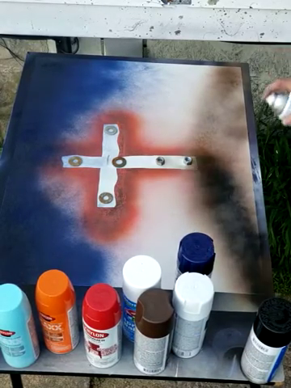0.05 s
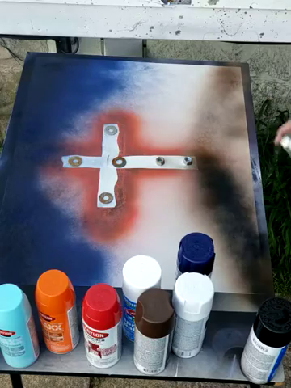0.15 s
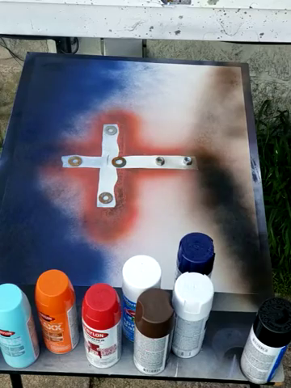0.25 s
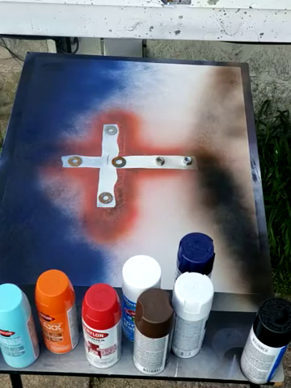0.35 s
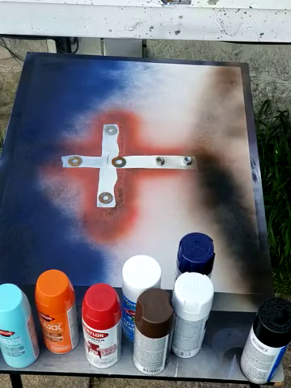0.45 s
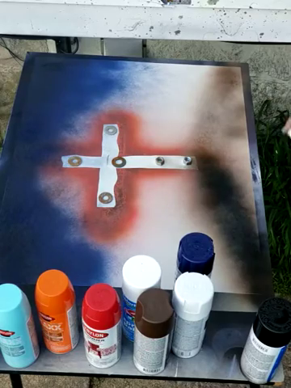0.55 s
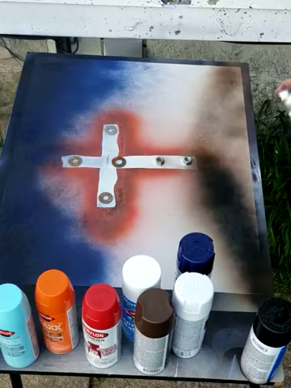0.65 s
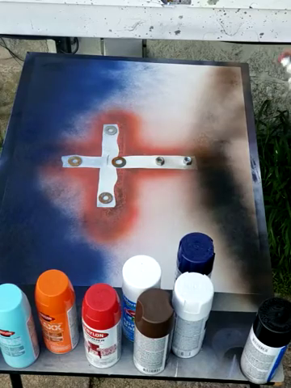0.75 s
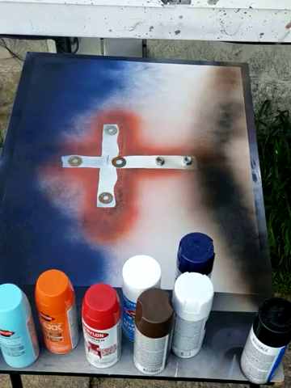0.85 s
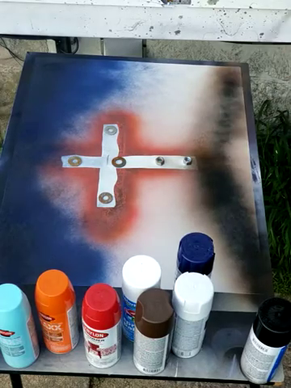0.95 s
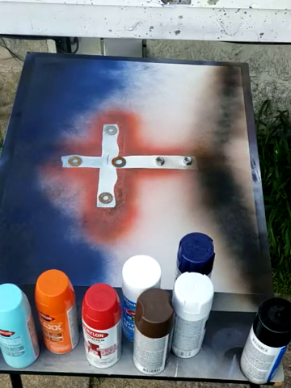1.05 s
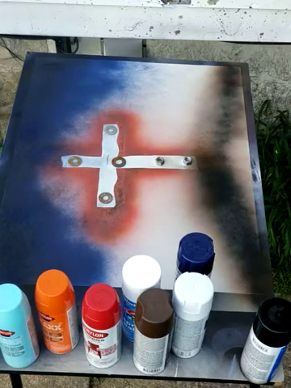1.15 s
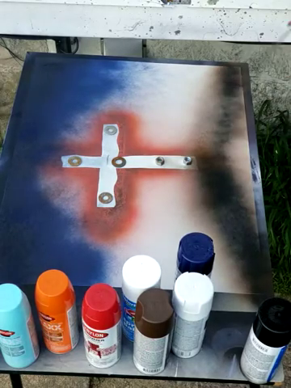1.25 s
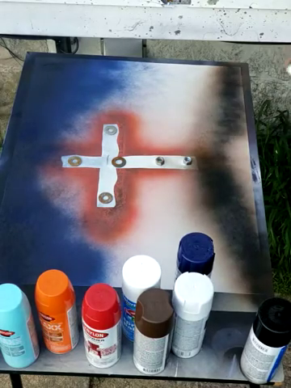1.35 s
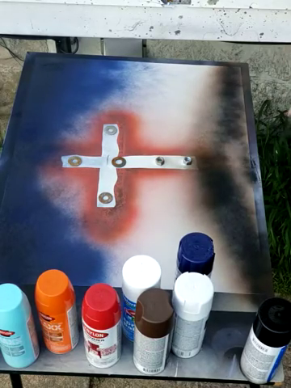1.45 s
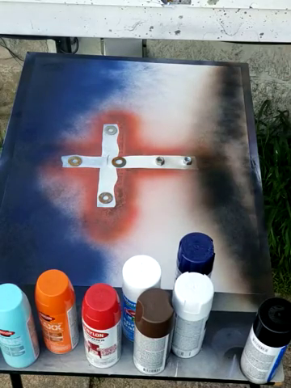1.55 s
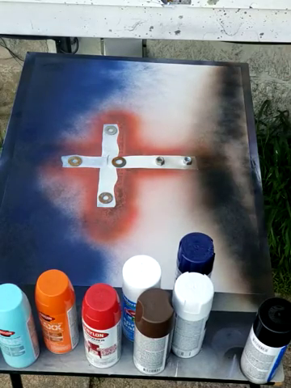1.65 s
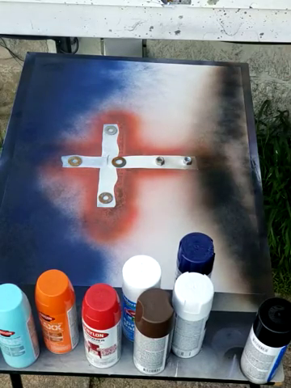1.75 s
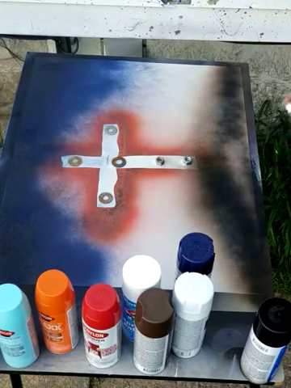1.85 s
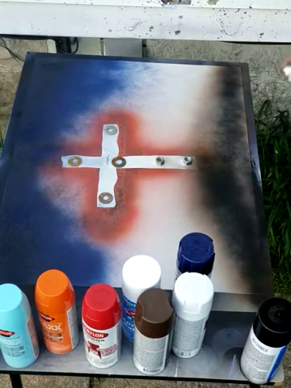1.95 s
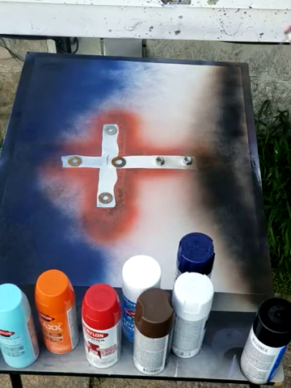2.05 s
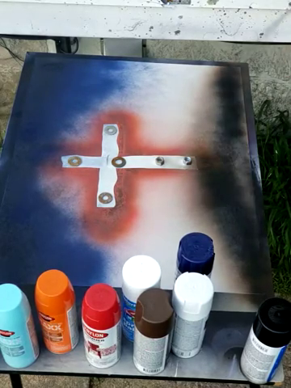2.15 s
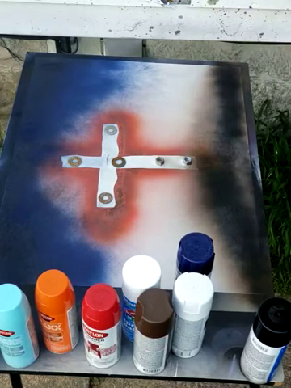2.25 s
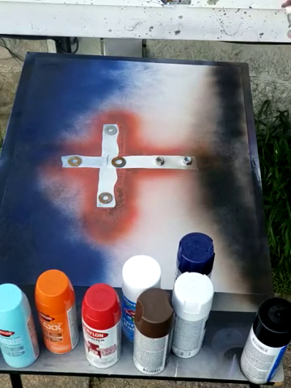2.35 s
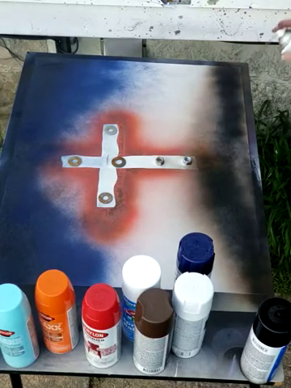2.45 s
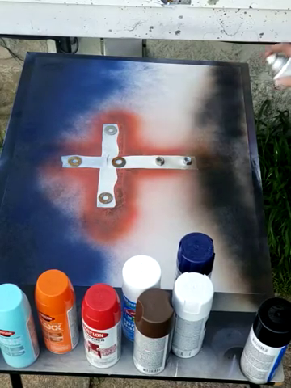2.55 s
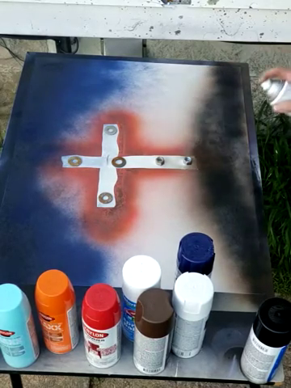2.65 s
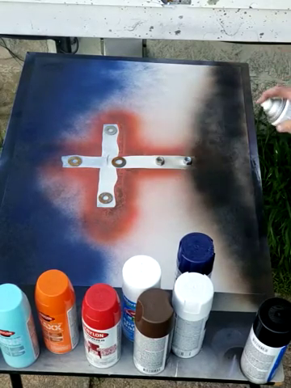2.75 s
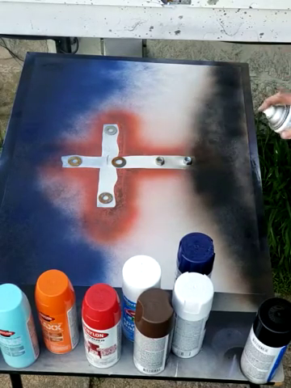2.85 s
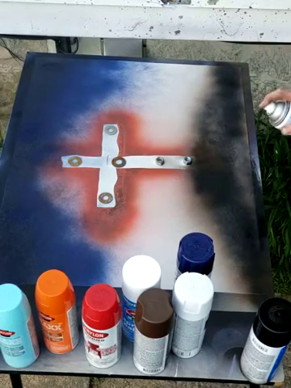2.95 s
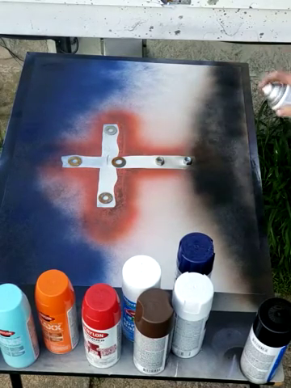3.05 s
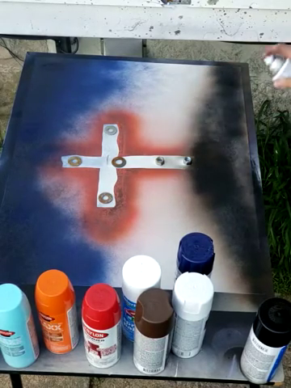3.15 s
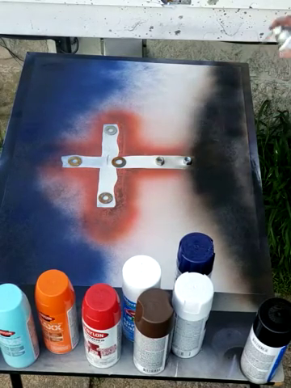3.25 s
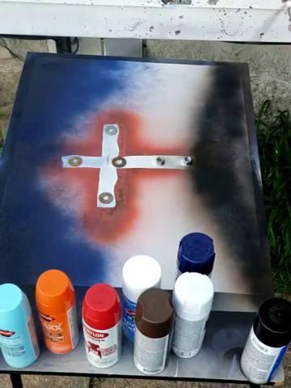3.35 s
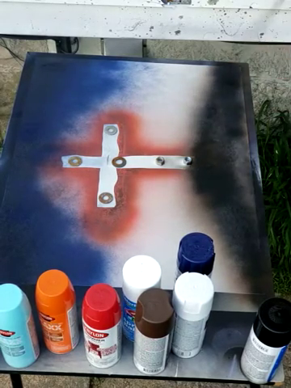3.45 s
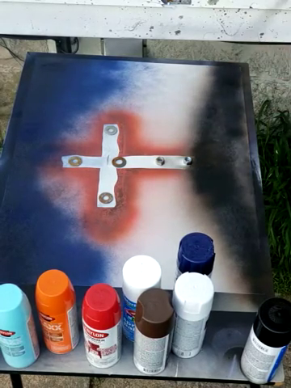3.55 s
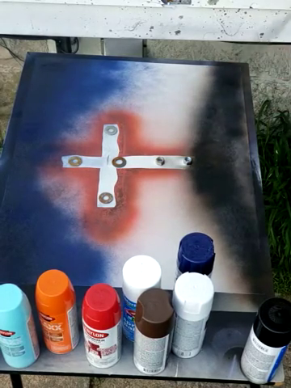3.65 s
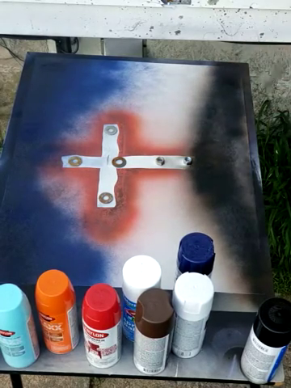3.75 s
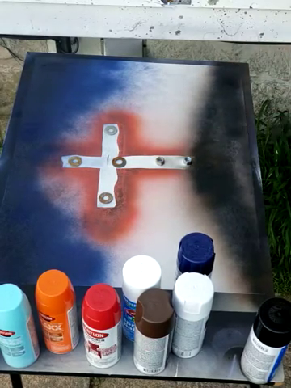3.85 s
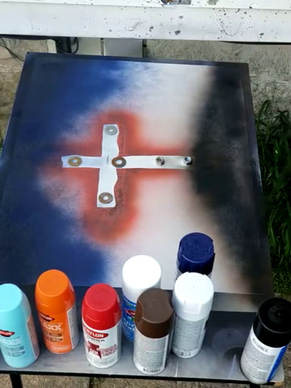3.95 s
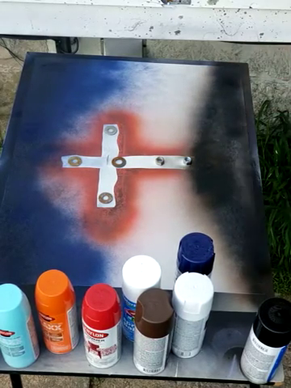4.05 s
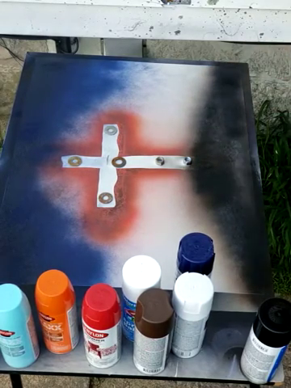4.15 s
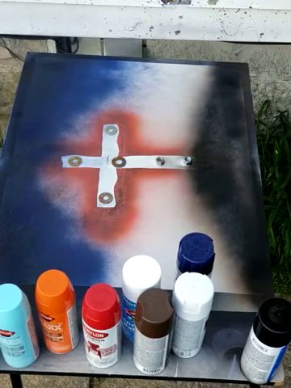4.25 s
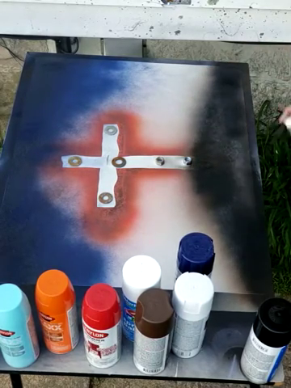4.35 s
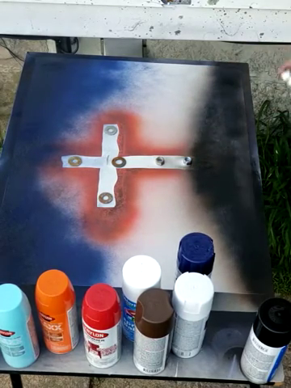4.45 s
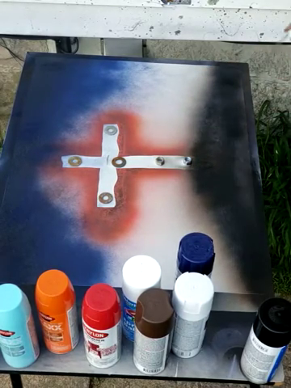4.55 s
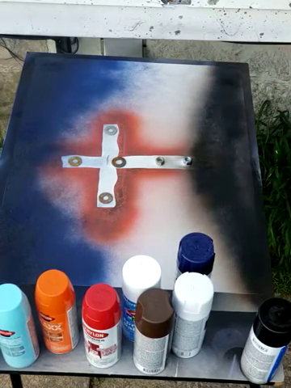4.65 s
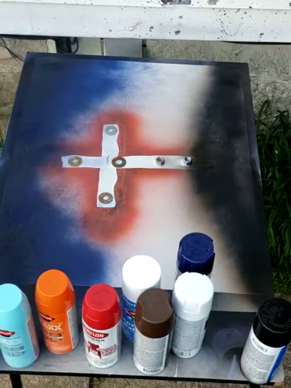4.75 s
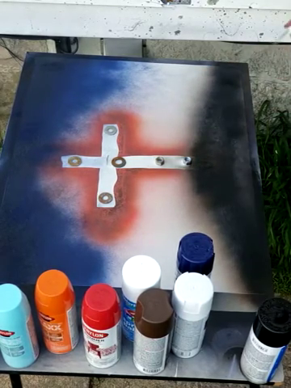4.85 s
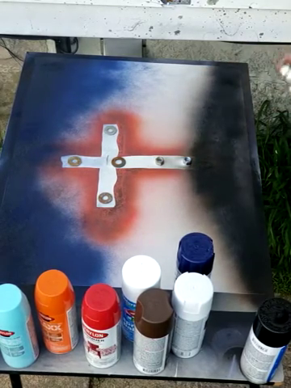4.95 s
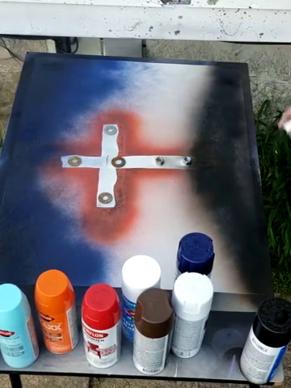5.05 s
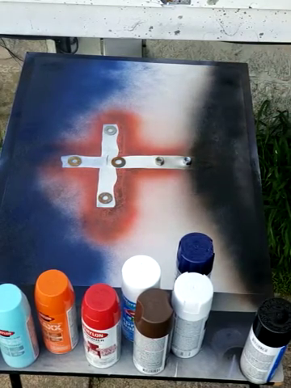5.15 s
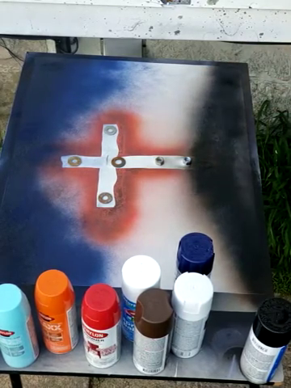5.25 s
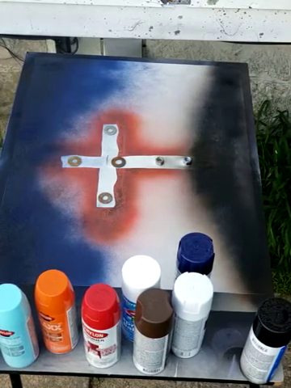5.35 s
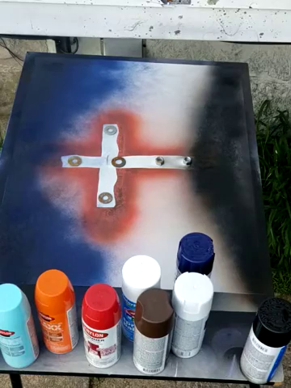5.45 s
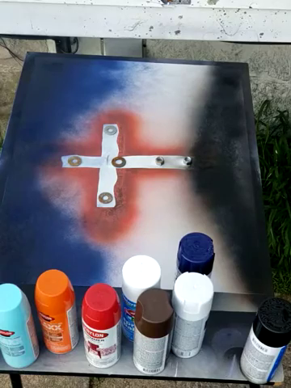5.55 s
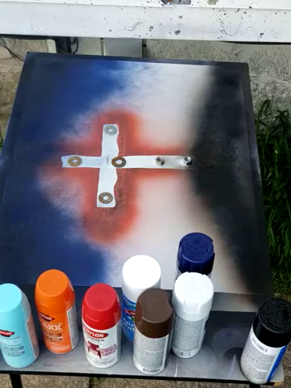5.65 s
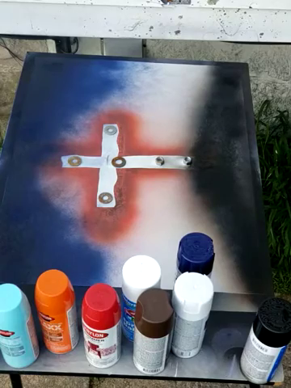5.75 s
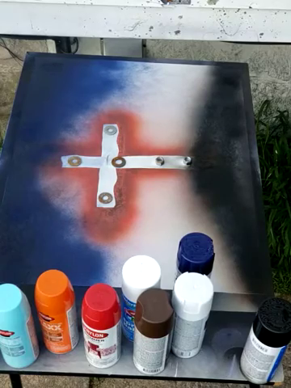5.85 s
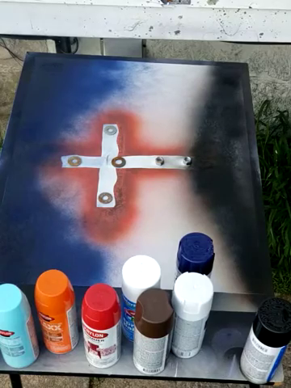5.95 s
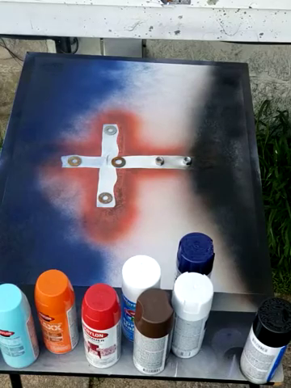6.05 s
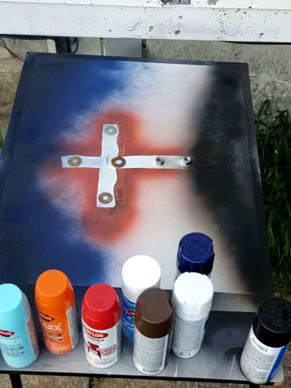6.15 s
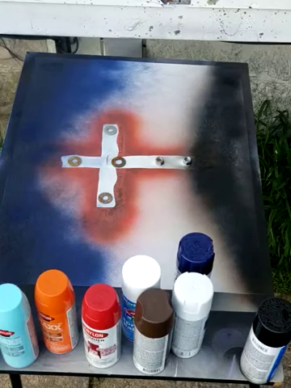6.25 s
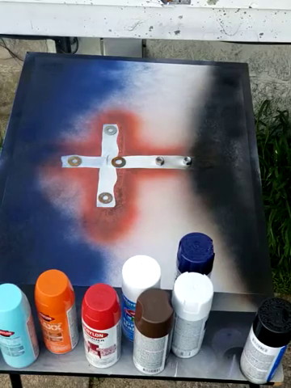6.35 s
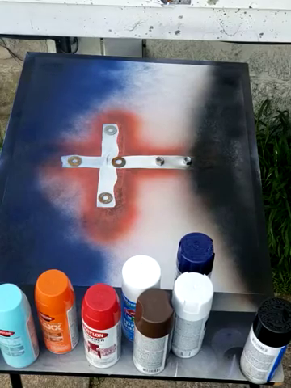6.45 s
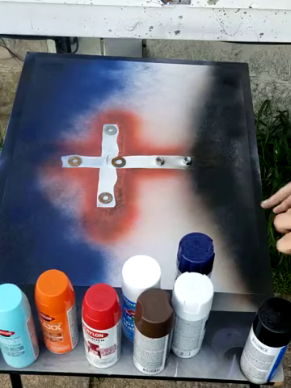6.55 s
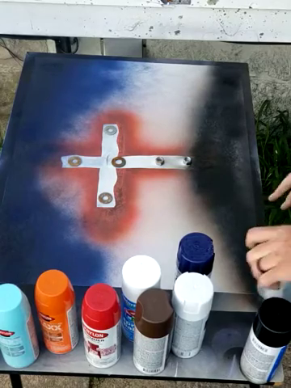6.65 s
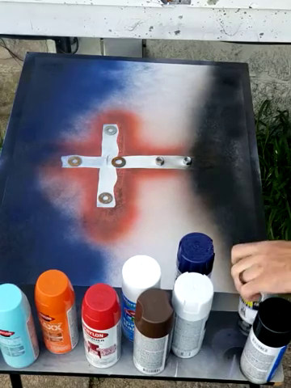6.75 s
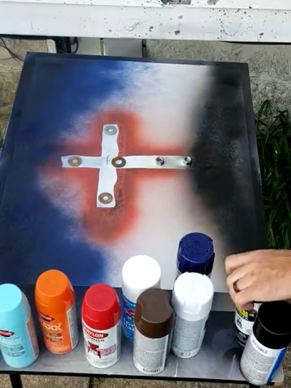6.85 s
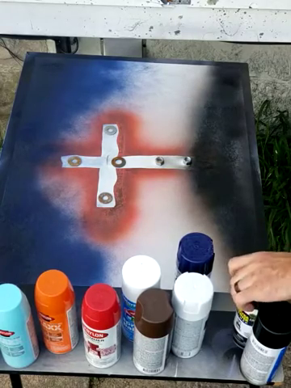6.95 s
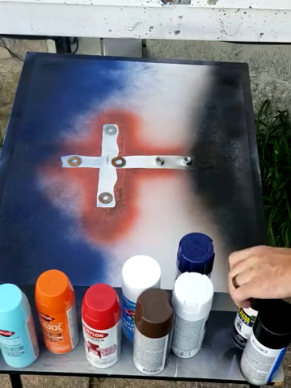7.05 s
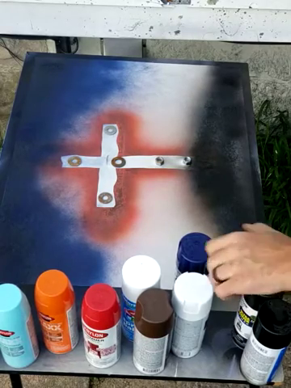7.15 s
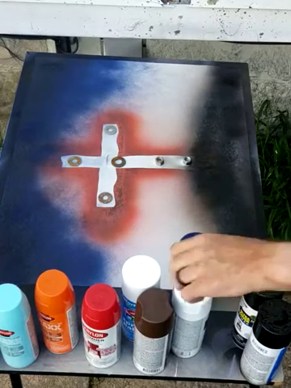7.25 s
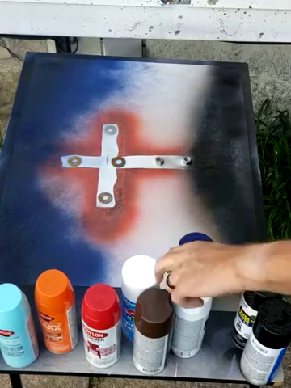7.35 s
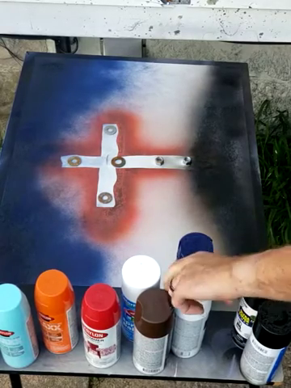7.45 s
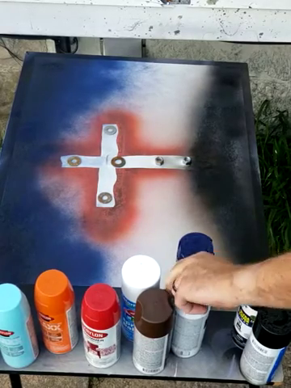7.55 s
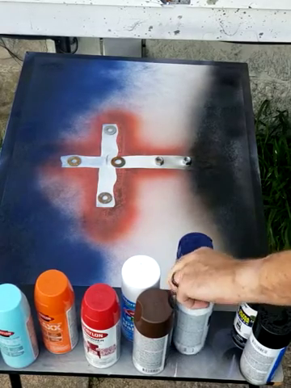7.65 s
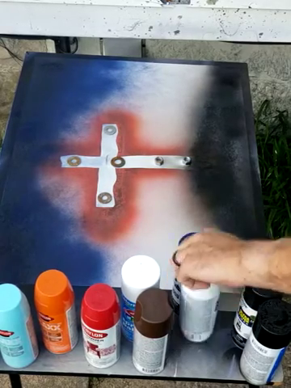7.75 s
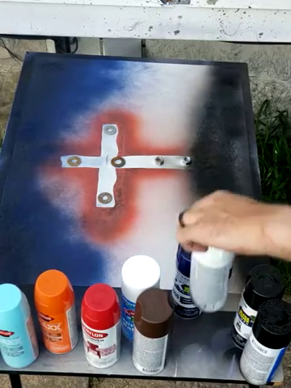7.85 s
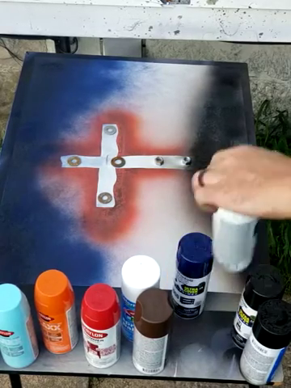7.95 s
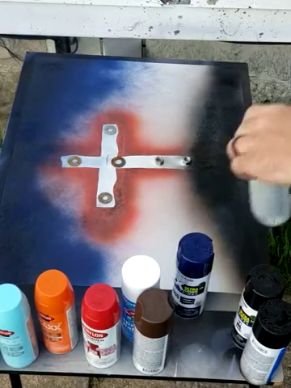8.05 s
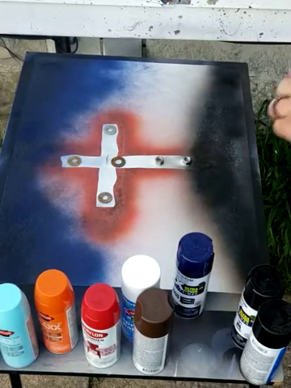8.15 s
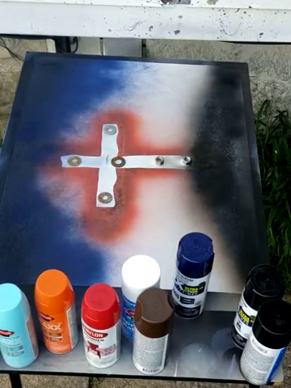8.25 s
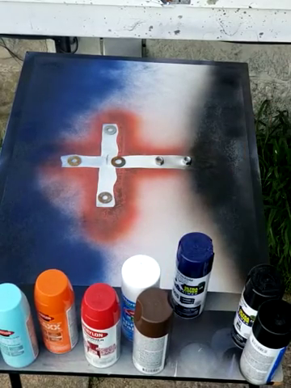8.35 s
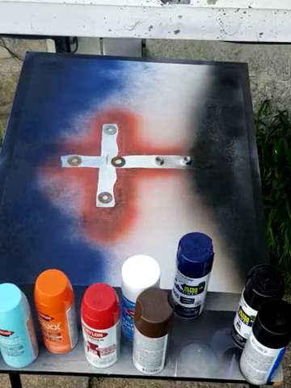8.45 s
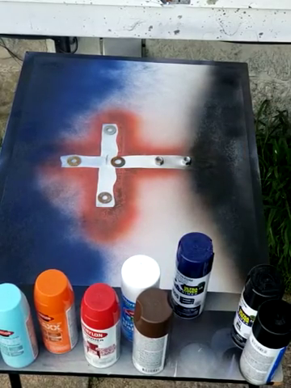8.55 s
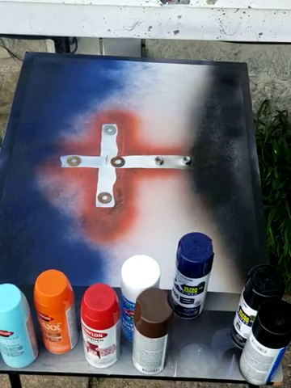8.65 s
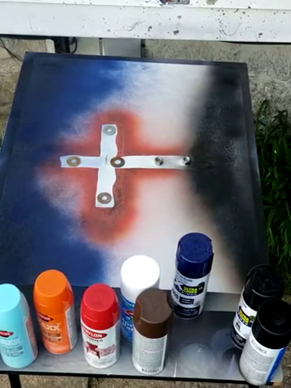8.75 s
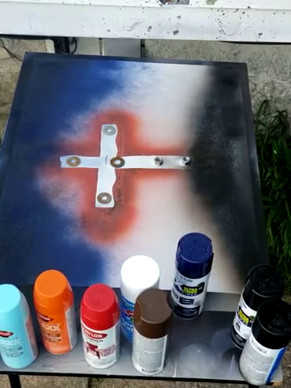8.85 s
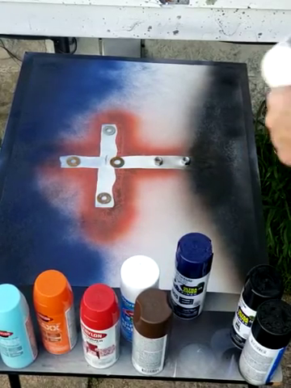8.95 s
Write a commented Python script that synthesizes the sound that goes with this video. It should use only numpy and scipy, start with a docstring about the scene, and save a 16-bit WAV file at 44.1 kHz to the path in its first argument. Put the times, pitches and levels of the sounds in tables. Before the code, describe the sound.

Outdoors, an aerosol can hisses in swishing strokes, is set down with a hard clack, and another is lifted and shaken amid falling bird chirps.

```python
"""A spray can hisses on the listener's right: eight strokes of a filtered-noise jet sweep over a board.
The board's delayed echo combs the hiss, and rough whistles mark the valve opening and closing.
The can is put down with a clack, others bump on a metal tray, and a fresh one is picked up and starts to
rattle: noise cracks with decaying modes, and gliding sines for the paint gulping inside.
A bird of narrow noise bands repeats a falling chirp, with thin peeps, over a low outdoor rumble."""
import sys
import numpy as np
from scipy import signal
from scipy.fft import rfft, irfft, next_fast_len
from scipy.io import wavfile
from scipy.ndimage import map_coordinates

SR = 44100
rng = np.random.default_rng(int(sys.argv[2]) if len(sys.argv) > 2 else 0)


def store_wav(level_fs):
    """Save 16-bit WAV to argv[1]."""
    pcm = np.round(np.clip(np.atleast_2d(level_fs), -1, 1) * 32767)
    wavfile.write(sys.argv[1], SR, pcm.T.astype(np.int16))


N = 397334
TIME = np.arange(N) / SR


def from_db(db):
    """Decibels to gain."""
    return 10 ** (np.asarray(db) / 20)


def rms_one(x):
    """Scale to unit rms."""
    return x / np.sqrt(np.mean(x ** 2) + 1e-20)


def in_time(rows, t=TIME):
    """The columns of a curve, joined by straight lines."""
    s, *columns = np.transpose(rows)
    return [np.interp(t, s, column) for column in columns]


def at_hz(points, hz):
    """Read a spectrum on a log-frequency axis."""
    f, value = np.transpose(points)
    return np.interp(np.log(hz + 1e-3), np.log(f), value)


def add(out, s, sound):
    """Mix a sound in at time s."""
    start = int(s * SR)
    out[:, start:start + sound.shape[1]] += sound[:, :N - start]


def bump(t, centre_s, half_s):
    """A smooth swell of height 1."""
    return np.exp(-((t - centre_s) / half_s) ** 2)


def swells(rows):
    """A sum of short exponential rises and falls in level."""
    return sum(from_db(level_db) * np.exp(-np.abs((TIME - s) / spread_s)) for s, level_db, spread_s in rows)


def drift(rate_hz):
    """Slow chance: random knots joined by straight lines, spread 1."""
    knots = rng.standard_normal(4000)
    return rms_one(np.interp(TIME * rate_hz, np.arange(len(knots)), knots))


def delayed(x, lag_ms):
    """Read a signal late by a moving lag."""
    return map_coordinates(x, [(TIME - lag_ms / 1000) * SR], order=3)


# Balance of a source fully to the right: pitch_hz, left_minus_right_db
RIGHT_SIDE_BALANCE = [(40, 0), (200, -2), (1000, -2.6), (2500, -4), (3300, -10), (4500, -16), (6000, -18),
                      (7200, -20), (8200, -9), (9300, -2.5), (10500, -5), (12000, -8), (14000, -7.5),
                      (15500, -6)]


def ears(hz, sideways):
    """Left and right gains: the far (left) ear is shaded, most around 7 kHz."""
    shade = from_db(sideways * at_hz(RIGHT_SIDE_BALANCE, hz))
    loudness = np.sqrt((1 + shade ** 2) / 2)
    return np.array([shade, np.ones_like(shade)]) / loudness


# How alike the two ears hear a spread-out sound: pitch_hz, likeness (0-1)
EAR_LIKENESS = [(30, 0.5), (100, 1), (400, 0.58), (1000, 0.05), (2000, 0), (5000, .05), (16000, 0.1)]


def noise(spectrum, sideways=1, size=N, likeness=EAR_LIKENESS):
    """Coloured stereo noise, partly alike in the two ears; its middle has rms 1."""
    padded = next_fast_len(size, True)
    hz = np.fft.rfftfreq(padded, 1 / SR)
    mid, side = rfft(rng.standard_normal((2, padded)))
    alike = np.clip(at_hz(likeness, hz), 0, 1)
    pair = np.sqrt(1 + alike) * mid + np.sqrt(1 - alike) * side * [[1], [-1]]
    low_skirt = 1 / np.sqrt(1 + (spectrum[0][0] / (hz + 1)) ** 6)  # rolls off below the first point
    colour = low_skirt * from_db(at_hz(spectrum, hz))
    x = irfft(pair * colour * ears(hz, sideways), padded)[:, :size]
    return x / np.std(x.mean(axis=0))


def narrow_noise(hz, width_hz):
    """A rough tone that follows a pitch curve; rms 1."""
    lowpass = signal.butter(3, width_hz / 2, fs=SR, output="sos")
    wobble = signal.sosfilt(lowpass, rng.standard_normal((2, len(hz))))
    phase = 2 * np.pi * np.cumsum(hz) / SR
    return rms_one(wobble[0] * np.cos(phase) + wobble[1] * np.sin(phase))


def garden(x, t60):
    """Scattered echoes from walls, fence and leaves: decaying noise as an impulse response."""
    t = TIME[:SR]
    onset = 1 - np.exp(-t / 0.0047)
    echoes = rng.standard_normal((2, SR)) * from_db(-60 * t / t60) * onset
    echoes /= np.sqrt(np.sum(echoes ** 2, axis=1, keepdims=True))
    return signal.fftconvolve(x, echoes, axes=1)[:, :N]


# Colour of the outdoor rumble: pitch_hz, relative_db_per_hz
AIR_COLOUR = [(25, -10.5), (58, -3.5), (80, -3.5), (120, -2), (170, -15), (260, -17.5), (450, -19),
              (650, -22), (1000, -25), (1600, -32), (2500, -34), (3800, -34), (6800, -36), (8200, -45.5),
              (15800, -38.5)]
# Level of the rumble before its slow drift: time_s, level_db
AIR_LEVEL = [(0, -59.5), (4.5, -59), (7.8, -59.5), (8.2, -58.5), (9, -55.5)]
# Faint hum: pitch_hz, level_db
HUM_TONES = [(344, -85), (646, -86)]
# Car passing on the far road: time_s, level_db
CAR_LEVEL = [(0, -81), (1.6, -81), (2.3, -70.5), (2.9, -61.5), (3.4, -64.5), (3.9, -74), (5, -78.5),
             (9, -74)]
# Colour of its tyre noise: pitch_hz, relative_db_per_hz
TYRE_COLOUR = [(250, -12), (600, -14), (800, -2.5), (930, -1), (1200, -4), (1550, -6), (1900, -9),
               (3000, -30.5)]


def outdoors():
    """Low rumble of air and town, a faint wavering hum, and a car on a far road."""
    air_gain = from_db(in_time(AIR_LEVEL)[0] + .5 * drift(16))
    air = air_gain * noise(AIR_COLOUR, sideways=0.64)
    hum = sum(from_db(level_db) * narrow_noise(np.full(N, hz), width_hz=16) for hz, level_db in HUM_TONES)
    car = from_db(in_time(CAR_LEVEL)[0]) * noise(TYRE_COLOUR, sideways=.5)
    return air + hum + car


# Notes of a smaller bird: centre_s, pitch_hz, level_db
PEEP_NOTES = [(.34, 6300, -71), (2.34, 7240, -88), (6.035, 7300, -78), (8.53, 4300, -72), (8.6, 4170, -69),
              (8.68, 3040, -75)]


def peeps():
    """Thin far notes that sag a little in pitch."""
    out, t = np.zeros((2, N)), TIME[:SR // 8]
    middle_s = t.mean()
    for s, hz, level_db in PEEP_NOTES:
        pitch = hz * (1.03 - .5 * t)
        note = from_db(level_db) * bump(t, middle_s, 0.036) * narrow_noise(pitch, width_hz=300)
        add(out, s - middle_s, note * ears(pitch, 0.94))
    return out


# Bird calls, drive level before the call's own shape and echo: start_s, level_db
CHIRP_CALLS = [(1.275, -48), (2.72, -45.5), (4.555, -50.5), (5.8, -46), (6.845, -50), (7.675, -46)]
# Fall of one call: after_start_s, pitch_hz, relative_db
CHIRP_FALL = [(0, 4600, -10.5), (.018, 4420, -2.5), (.05, 4170, 1.5), (.06, 3663, -2), (.075, 3548, -1.5),
              (.1, 3436, -3.5), (.112, 3017, -11), (.135, 2745, -18), (.16, 2720, -37)]


def bird(upper_ratio=1.33, upper_db=-11.0, upper_s=0.026, held_hz=3560, held_db=-4.0, held_s=.09):
    """A harsh falling chirp with a brief higher voice at its start, far enough off to trail an echo."""
    out, t = np.zeros((2, N)), TIME[:SR // 6]
    hz, shape_db = in_time(CHIRP_FALL, t)
    for s, level_db in CHIRP_CALLS:
        lower = from_db(shape_db - 1) * narrow_noise(hz, width_hz=640)
        # the fall pauses on a clearer note
        held = narrow_noise(np.full(len(t), held_hz), width_hz=160)
        lower += from_db(held_db) * bump(t, held_s, .02) * held
        upper_swell = np.exp(-(t / upper_s - 1) ** 2 * 2)
        upper = from_db(upper_db) * upper_swell * narrow_noise(upper_ratio * hz, width_hz=900)
        add(out, s, from_db(level_db) * ears(hz, 0.71) * lower)
        add(out, s - .015, from_db(level_db - 3.5) * ears(upper_ratio * hz, 0.98) * upper)
    return 0.95 * out + from_db(-3) * garden(out, t60=0.95)


# Paint gulping in a tilted can: start_s, pitch_hz, level_db, glide_per_s (pitch moves by twice this share)
GULPS = [(5.584, 942, -31, 2), (5.598, 898, -32, -4.5), (5.611, 666, -39, 1), (5.675, 750, -51, -8),
         (5.82, 646, -49.5, -3), (8.7636, 470, -31, 1), (8.799, 450, -42.5, 1), (8.8561, 443, -31.5, 9),
         (8.863, 693, -32.5, 4), (8.8759, 920, -32.5, 1.5)]


def glugs(t60=0.048):
    """Air pockets in the paint ring briefly and glide as they swell or shrink."""
    out, t = np.zeros((2, N)), TIME[:SR // 10]
    for s, hz, level_db, glide in GULPS:
        ring = np.sin(2 * np.pi * hz * t * (1 + glide * t))
        tone = ring * from_db(level_db - 60 * t / t60)
        add(out, s, ears(np.array([hz]), 0.98) * tone)
    return out


def blows(rows, modes, crack_colour, crack_t60, tail_db, tail_t60, ring_db, sideways):
    """Each blow is a short crack with a rattling tail, and strikes every mode with a strength of its own."""
    out, t = np.zeros((2, N)), TIME[:SR // 2]
    hz, mode_db, t60 = np.transpose(modes)
    decay = from_db(-60 * t / np.clip(t60, .005, .35)[:, None])
    for s, body_db, crack_db in rows:
        strike_db = body_db + ring_db + mode_db + rng.normal(0, 2.7, len(hz))
        strengths = from_db(strike_db) * rng.choice([-1, 1], len(hz))
        ring = (ears(hz, sideways) * strengths) @ (decay * np.sin(2 * np.pi * hz[:, None] * t))
        fading = from_db(-60 * t / crack_t60) + from_db(tail_db - 60 * t / tail_t60)
        crack = from_db(crack_db) * fading * noise(crack_colour, sideways, size=len(t))
        add(out, s, ring + crack)
    return out


# Blows, drive levels before mode, tail and ring trims: start_s, body_db, crack_db
CAN_CLACKS = [(6.1338, -22, -13.5), (6.1395, -41, -28), (6.211, -60, -49), (6.222, -60, -45),
              (6.362, -60, -52), (7.524, -61, -52.5)]
TRAY_HITS = [(6.7895, -55, -43), (6.797, -52, -39), (6.807, -41, -35.5), (6.858, -43, -51),
             (6.909, -44, -38.5), (6.914, -23, -26.5), (6.921, -41, -42), (6.942, -43, -48),
             (7.019, -43, -48), (7.029, -35, -40), (7.054, -53, -51)]
KNOCKS_OF_BALL = [(8.7634, -35.5, -41.5), (8.799, -49, -51), (8.8572, -44, -37.5), (8.8628, -39, -35),
                  (8.8695, -42, -32.5), (8.8755, -45, -30), (8.881, -39, -37)]
CLINKS_OF_BALL = [(8.9558, -47, -37.5), (8.9792, -23, -37)]
TICKS_IN_PAINT = [(5.478, -33.5, -50.5), (5.5617, -32, -49), (5.584, -44, -64), (5.6095, -37, -45),
                  (5.717, -51, -53)]
# What rings when struck: pitch_hz, relative_db, t60_s
CAN_RING = [(220, -6.5, .06), (482, -7, 0.054), (670, -0.5, .05), (950, -10, .04), (1215, -12, .04),
            (1750, -6.5, 0.061), (2310, -12, .05), (2740, -7, .05), (3220, -1, 0.039), (3510, -6.5, .06),
            (3920, 3, 0.096), (4540, 1.5, 0.065), (5390, 3.5, 0.055), (6850, 1, .06)]
TRAY_RING = [(116.6, -10.5, 0.23), (217, -10.5, 0.26), (261, -5, 0.24), (330, -7, .14), (426, -4, 0.099),
             (451, 3.5, 0.12), (648, -5, .06), (710, 1, 0.078), (793, -6, 0.055), (959, -2, 0.094),
             (1194, -2.5, 0.045), (1370, -11, 0.095), (1550, -17, 0.1), (3630, -7, .04)]
WALL_RING = [(1060, -1, .05), (1820, 2, 0.05), (2190, -11, 0.14), (2360, -18, 0.11), (3370, -6, 0.1),
             (4000, -10, 0.055)]
BALL_RING = [(1945, -14, .04), (3260, -5, 0.045), (3870, -6, 0.054), (5870, 1, 0.046), (6050, 1, 0.041),
             (6360, -4, .05), (6900, -7, 0.037), (9010, -21, .12), (12060, -11, 0.063), (13500, -16, .08)]
PAINT_RING = [(1128, -4, 0.029), (1270, -7.5, 0.029), (2220, -8.5, 0.037), (2864, 3, 0.017),
              (3240, -3.5, 0.031), (4760, -5, .03)]
# Colour of the contact: pitch_hz, relative_db_per_hz
HARD_CONTACT = [(200, -20), (550, 2.5), (900, 1.5), (2000, -2), (4000, 5.5), (5500, 3), (7200, -0.5),
                (8300, -24), (11500, -9), (15500, -11)]
DULL_CONTACT = [(120, -11), (450, -9), (1000, 3.5), (1600, -3.5), (2400, 5.5), (4000, -5), (6500, -6),
                (8500, -19), (12000, -13), (15500, -13)]
TRAY_CONTACT = [(150, -1), (250, 6.5), (450, 2), (1000, -3), (1500, -11.5), (2400, -16), (4000, -13.5),
                (6500, -19.5), (8500, -39), (12000, -27), (15500, -24)]
BALL_CONTACT = [(400, -18), (1900, -1), (3700, -1), (6200, 1.5), (8000, -14), (12000, -6), (15500, 0.5)]
# Hand and sleeve brushing the cans: centre_s, level_db, spread_s
SLEEVE_BRUSHES = [(5.23, -67, 0.11), (5.366, -61, 0.013), (5.537, -65, 0.022), (5.68, -61, 0.074),
                  (5.84, -62, .03), (5.938, -67, 0.035), (6.217, -70, 0.015), (6.391, -63, 0.058),
                  (7.48, -65.5, 0.033), (8.297, -58.5, 0.02), (8.438, -56.5, 0.024), (8.585, -61.5, 0.029)]
# Colour of the cloth: pitch_hz, relative_db_per_hz
CLOTH_COLOUR = [(1500, -9.5), (3500, -9), (6500, 1), (8500, -17.5), (12000, -7), (15500, -1.5)]
# Paint washing round the can: centre_s, level_db, spread_s
PAINT_WASH = [(5.51, -54.5, 0.021), (5.6, -54.5, 0.038), (5.7, -64.5, 0.051)]
# Colour of the wash: pitch_hz, relative_db_per_hz
PAINT_WASH_COLOUR = [(350, -13.5), (700, 0.5), (1100, 0), (1600, -11), (2200, -1), (2900, -5), (3800, -13),
                     (4800, -6), (8000, -26), (15000, -41)]


def handling():
    """Cans are put down, bumped, gripped and shaken: struck modes, brushed noise and gulps."""
    dry = blows(CAN_CLACKS, CAN_RING, HARD_CONTACT, crack_t60=0.01,
                tail_db=-17, tail_t60=0.13, ring_db=-9, sideways=0.93)
    dry += blows(TRAY_HITS, TRAY_RING, TRAY_CONTACT, crack_t60=0.035,
                 tail_db=-13, tail_t60=0.4, ring_db=-7.5, sideways=1.0)
    dry += blows(KNOCKS_OF_BALL, WALL_RING, DULL_CONTACT, crack_t60=0.017,
                 tail_db=-12, tail_t60=0.15, ring_db=-9.5, sideways=0.86)
    dry += blows(CLINKS_OF_BALL, BALL_RING, BALL_CONTACT, crack_t60=0.018,
                 tail_db=-3, tail_t60=0.15, ring_db=-7.5, sideways=0.99)
    dry += blows(TICKS_IN_PAINT, PAINT_RING, HARD_CONTACT, crack_t60=0.011,
                 tail_db=-12, tail_t60=.12, ring_db=-6.5, sideways=1.0)
    dry += swells(SLEEVE_BRUSHES) * from_db(1.8 * drift(140)) * noise(CLOTH_COLOUR, sideways=.8)
    dry += swells(PAINT_WASH) * from_db(4.4 * drift(120)) * noise(PAINT_WASH_COLOUR, sideways=.8)
    dry += glugs()
    return dry + from_db(-23.5) * garden(dry, t60=.55)


# Turning points of the swinging hand, which lifts at each turn:
# turn_s, place (0 at one end of the board, 1 at the other), extra_echo_lag_ms
HAND_TURNS = [(-.25, 0.56, .1), (.36, -0.11, 0.098), (1.08, 1.13, .03), (1.65, .1, 0.066),
              (2.24, 1.03, .02), (2.9, 0.046, .08), (3.52, 0.99, 0.018), (4.2, 0.16, 0.23),
              (4.78, 1.15, .08), (5.18, -0.19, 0.085)]
ECHO_LAG_MS = 0.649  # lag of the board's echo at the bottom of a swing


def hand(tremor_ms=0.0058):
    """Place and echo lag of the nozzle: it eases between turns, dips to the board and trembles a little."""
    s, place, lift_ms = np.transpose(HAND_TURNS)
    turns = np.arange(len(s))
    turn, part = np.divmod(np.interp(TIME, s, turns), 1)
    swing = np.cos(np.pi * part)
    eased = turn + (1 - swing) / 2
    lift = np.interp(eased, turns, lift_ms) * swing ** 2
    return np.interp(eased, turns, place), ECHO_LAG_MS + lift + tremor_ms * drift(20)


AIM_PLACE = 0.33  # here the jet points squarely at the board: hiss and echo are strongest
ECHO_REACH = .75  # how far off the aim the echo fades (board lengths)
LEAD_MS, LEAD_PER_PLACE_MS = -0.023, 0.23  # lead of the left ear at place 0; growth along the board


def board_echo(x, strength, place, lag_ms, left_extra_ms=0.077):
    """The board mirrors the jet; as the nozzle moves, a comb glides through the hiss."""
    lead_ms = LEAD_MS + LEAD_PER_PLACE_MS * place
    strength = strength * np.exp(-((place - AIM_PLACE) / ECHO_REACH) ** 2)
    left = delayed(x[0], -lead_ms) + strength * delayed(x[0], lag_ms + left_extra_ms - lead_ms)
    right = x[1] + strength * delayed(x[1], lag_ms)
    return np.array([left, right]) / np.sqrt(1 + strength ** 2)


# Strokes, drive levels before aim, build-up and sputter:
# open_s, close_s (valve starts closing), hiss_db, first_puff_db, opening_whistle_db, closing_whistle_db
SPRAY_STROKES = [(-.04, 0.21, -31, -67, -43, -56), (0.554, 0.967, -31.5, -63.5, -51.5, -56),
                 (1.195, 1.532, -31, -75, -52, -56), (1.722, 2.191, -31.5, -57, -45, -51),
                 (2.42, 2.73, -32, -58, -46, -53), (3.008, 4.066, -31.5, -57, -44, -54.5),
                 (4.211, 4.565, -30, -46.5, -44.5, -61), (4.816, 5.119, -30, -69, -53, -50)]
# Bright hiss of the jet: pitch_hz, relative_db_per_hz
HISS_COLOUR = [(6000, -58), (8000, -17), (9000, -14.5), (10000, -9), (11000, -4.5), (12200, -1),
               (13300, 0.5), (14500, 4), (15600, 5.5), (16200, -1.5)]
# Lower roar of the jet: pitch_hz, relative_db_per_hz
RUSH_COLOUR = [(700, -30), (1700, -21.5), (2200, -13.5), (2550, -10.5), (2900, -14), (4400, -4.5),
               (5700, -2), (6300, -0.5), (7200, 2), (8000, -7), (9000, -13), (11000, -28.5)]
# How alike the two ears hear the jet: pitch_hz, likeness (0-1)
JET_EAR_LIKENESS = [(1000, 0.7), (5000, 0.17), (16000, 0.02)]
OFF_AIM_LEFT_DB, OFF_AIM_RIGHT_DB = -8.5, -9.5  # change of the hiss one board length off aim
RUSH_DB, RUSH_OFF_AIM_DB = -47, -3.5  # the lower roar is hardly beamed
HISS_ECHO, RUSH_ECHO = .42, .18  # echo strength when squarely aimed (0-1)
BUILD_DB, BUILD_S = -3.5, 0.076  # the hiss starts this much lower and builds up as the valve is pushed further in
WHISTLE_HZ = 2655
SPIT_S, SPIT_DB, SPIT_HALF_S = 1.838, 3.5, 0.011  # the nozzle spits once


def spray(open_s=0.0045, close_s=0.0083, close_lag_s=.022, whistle_s=0.021, whistle_lag_s=0.029,
          whistle_lead_s=.016, puff_lead_s=0.02, leak_db=-13.0, waver_db=0.93, rough_db=.7):
    """A turbulent jet behind a valve that snaps open and eases shut; half open, the nozzle whistles roughly."""
    valve, atomised, whistles = np.zeros(N), np.zeros(N), np.zeros((2, N))
    for start, end, hiss_db, puff_db, opening_db, closing_db in SPRAY_STROKES:
        near = (TIME > start - .1) & (TIME < end + .2)
        t = TIME[near]
        puff = bump(t, start - puff_lead_s, 0.0088)  # gas escapes just ahead of the paint
        opening = 1 / (1 + np.exp((start + 0.0023 - t) / open_s))
        flow = opening / (1 + np.exp((t - end - close_lag_s) / close_s))
        valve[near] += flow + from_db(leak_db) * puff
        build_db = BUILD_DB * np.exp(-np.maximum(t - start, 0) / BUILD_S)
        atomised[near] += flow * from_db(hiss_db + build_db)
        level = from_db(puff_db) * puff
        level += from_db(opening_db) * bump(t, start + whistle_lag_s, whistle_s)
        level += from_db(closing_db) * bump(t, end - whistle_lead_s, whistle_s)
        # the puff chirps upward
        pitch = WHISTLE_HZ * np.interp(t - start, [-.035, -.015, .015], [.85, 1.1, 1])
        tone = 0.82 * narrow_noise(pitch, width_hz=254) + 0.5 * narrow_noise(1.1 * pitch, width_hz=1130)
        whistles[:, near] += level * tone * ears(pitch, 1)
    place, lag_ms = hand()
    off_aim = (place - AIM_PLACE) ** 2
    # droplets break off unevenly
    spit_db = SPIT_DB * bump(TIME, SPIT_S, SPIT_HALF_S)
    sputter = from_db(waver_db * drift(45) + rough_db * drift(400) + spit_db)
    hiss_beam = from_db(np.outer([OFF_AIM_LEFT_DB, OFF_AIM_RIGHT_DB], off_aim))
    hiss = atomised * sputter * hiss_beam * noise(HISS_COLOUR, likeness=JET_EAR_LIKENESS)
    rush_gain = from_db(RUSH_DB + RUSH_OFF_AIM_DB * off_aim)
    rush = valve * sputter * rush_gain * noise(RUSH_COLOUR, likeness=JET_EAR_LIKENESS)
    # the treble is beamed at the board and comes back strongest
    dry = board_echo(hiss, HISS_ECHO, place, lag_ms) + board_echo(rush, RUSH_ECHO, place, lag_ms) + whistles
    return dry + from_db(-13.5) * garden(dry + 0.28 * dry[::-1], t60=0.21)


def scene():
    """All sources, left and right, from the background to the spray."""
    return outdoors() + peeps() + bird() + handling() + spray()


def record(dry):
    """The top is cut steeply by an elliptic low-pass."""
    return signal.sosfilt(signal.ellip(12, .1, 80, 15780, fs=SR, output="sos"), dry)  # cutoff in Hz


dry = scene()
out = record(dry)
store_wav(out)
```